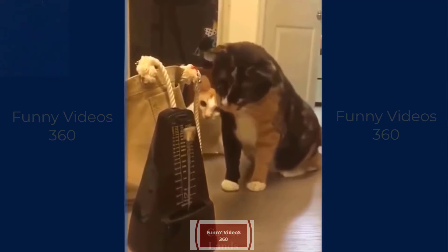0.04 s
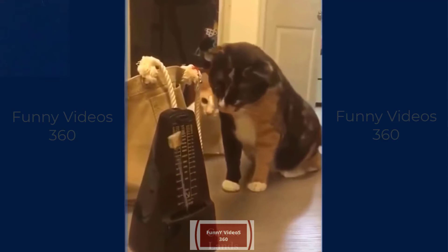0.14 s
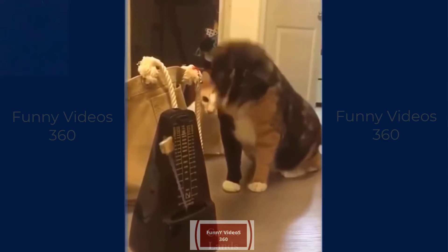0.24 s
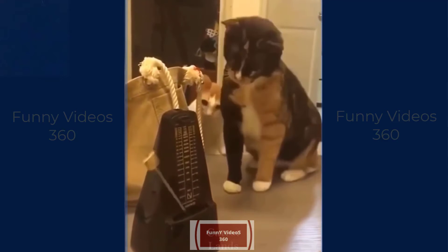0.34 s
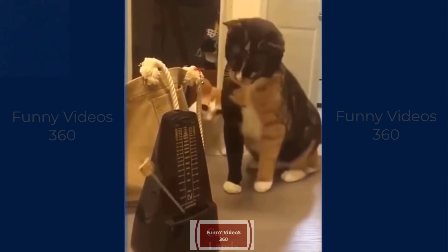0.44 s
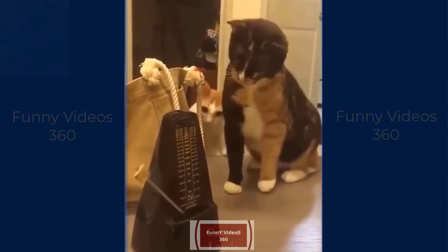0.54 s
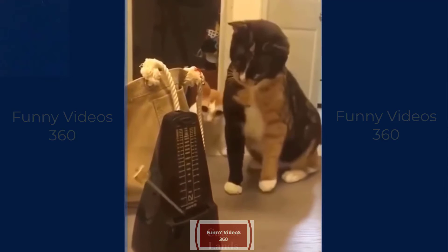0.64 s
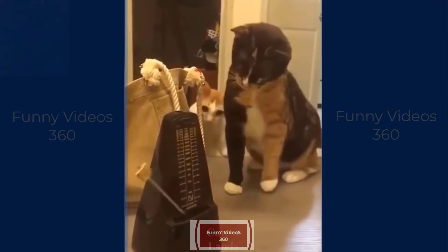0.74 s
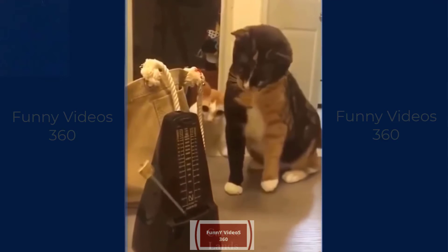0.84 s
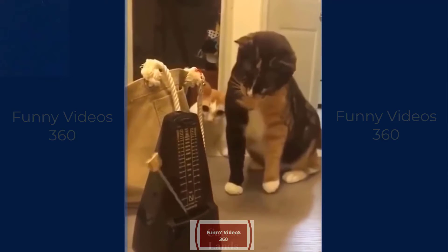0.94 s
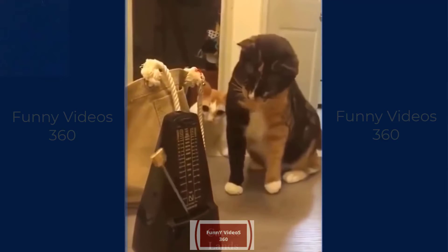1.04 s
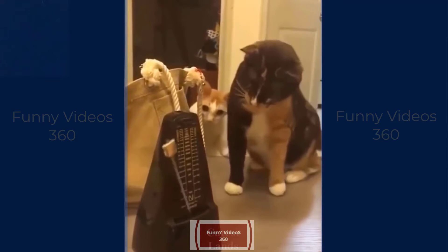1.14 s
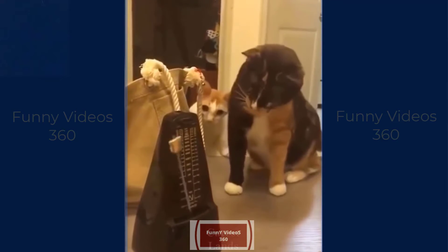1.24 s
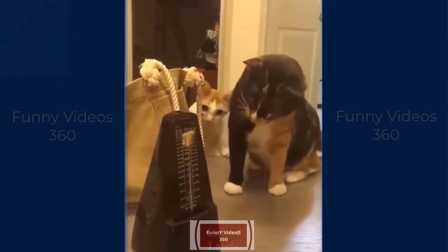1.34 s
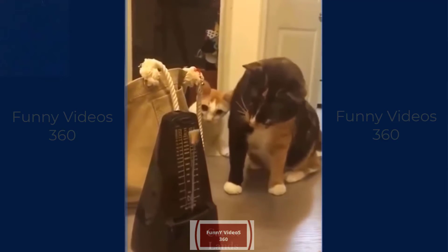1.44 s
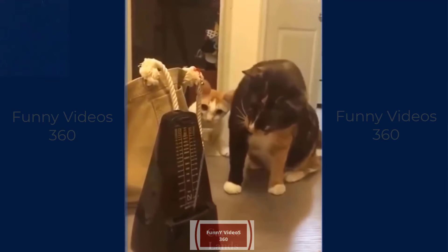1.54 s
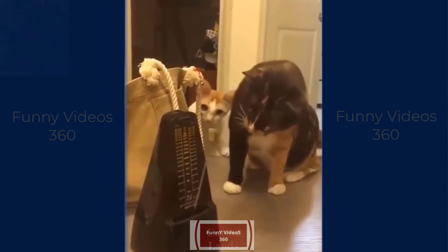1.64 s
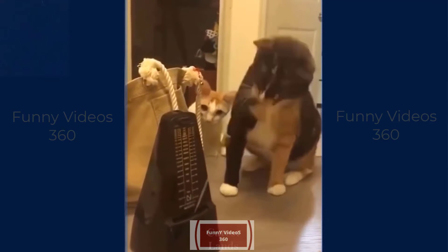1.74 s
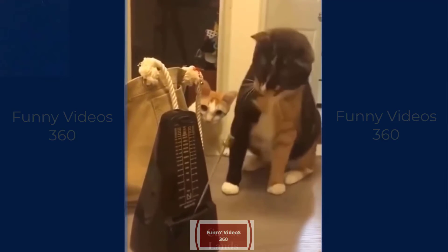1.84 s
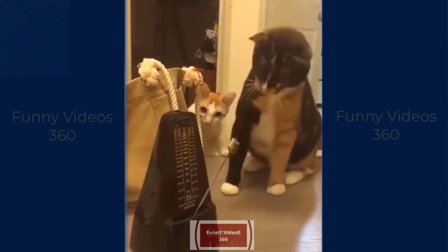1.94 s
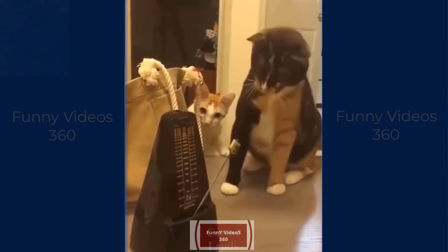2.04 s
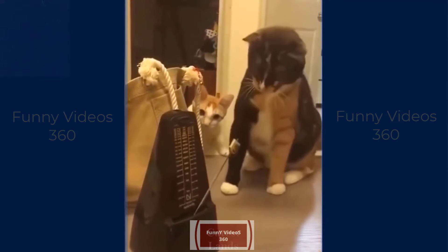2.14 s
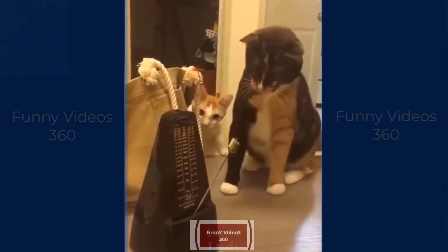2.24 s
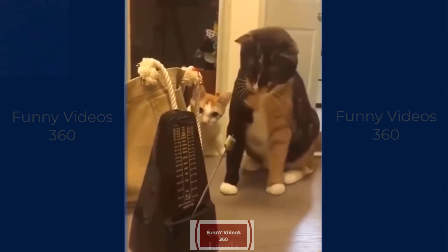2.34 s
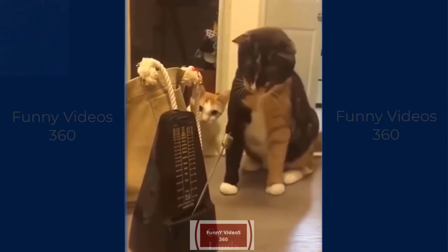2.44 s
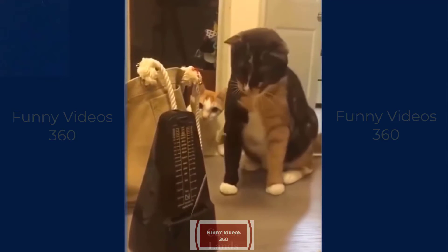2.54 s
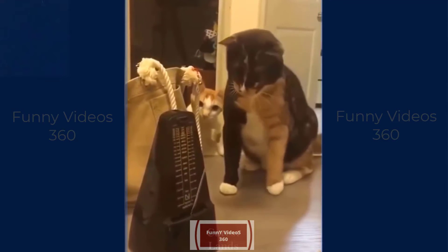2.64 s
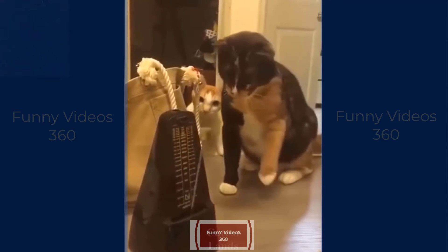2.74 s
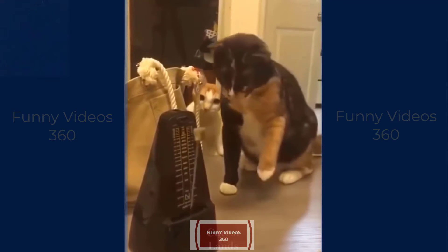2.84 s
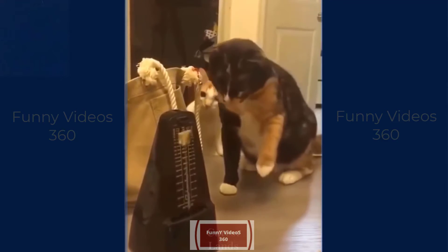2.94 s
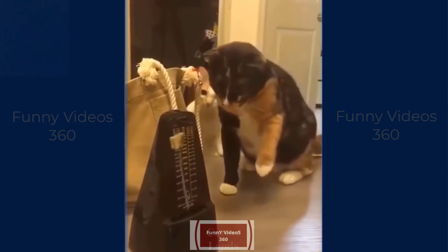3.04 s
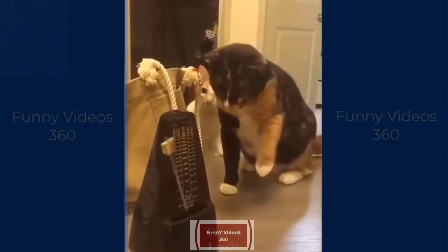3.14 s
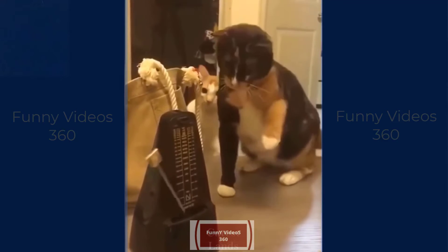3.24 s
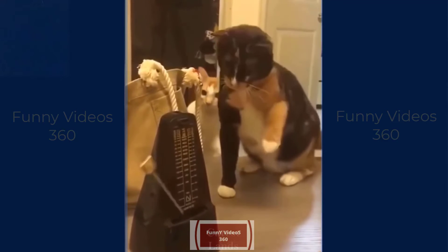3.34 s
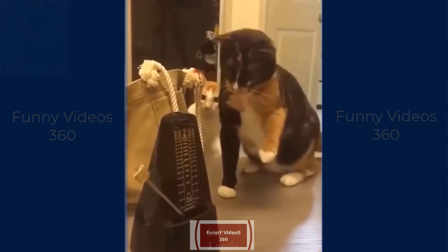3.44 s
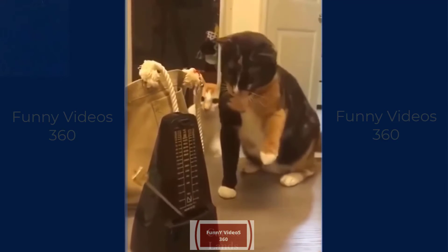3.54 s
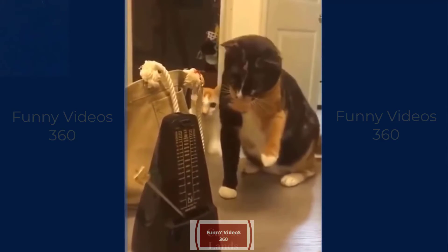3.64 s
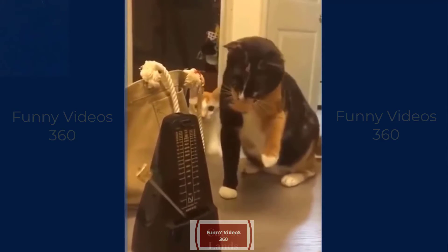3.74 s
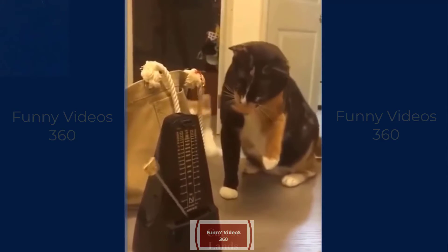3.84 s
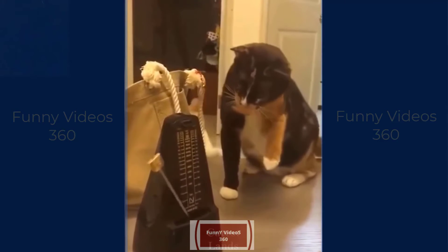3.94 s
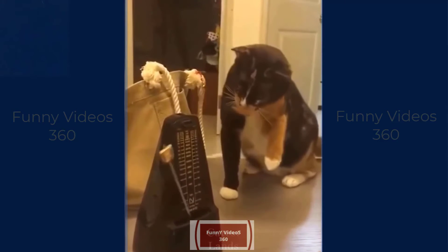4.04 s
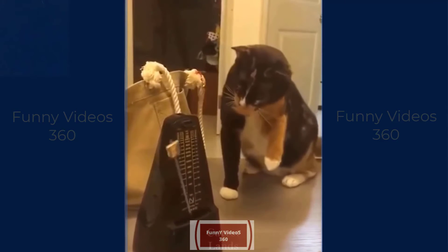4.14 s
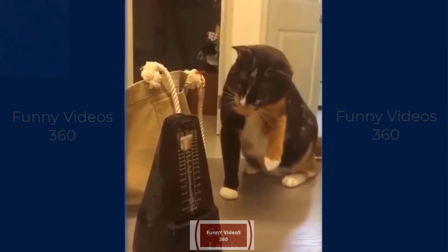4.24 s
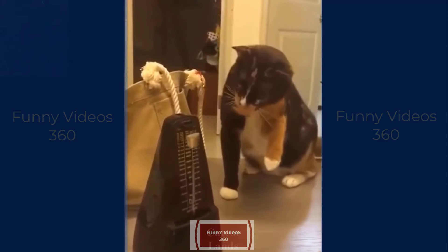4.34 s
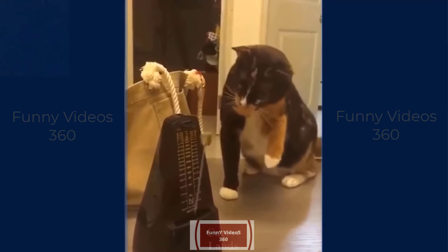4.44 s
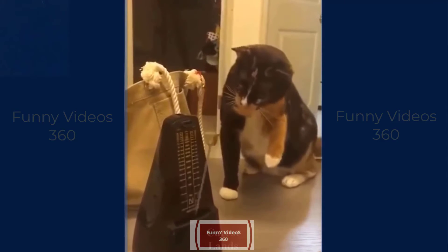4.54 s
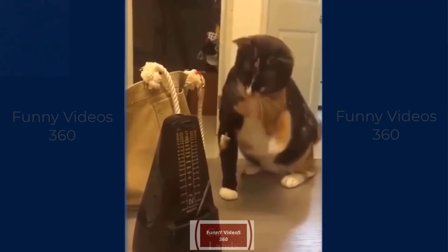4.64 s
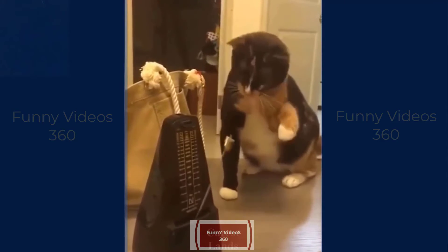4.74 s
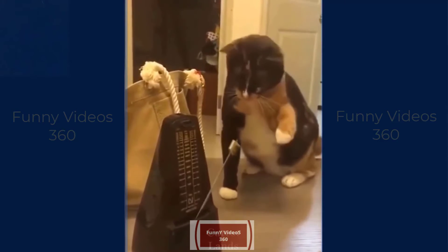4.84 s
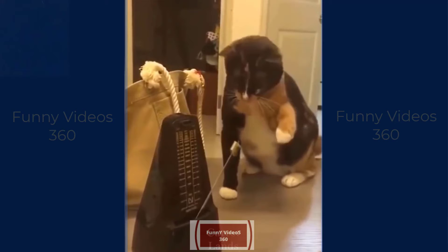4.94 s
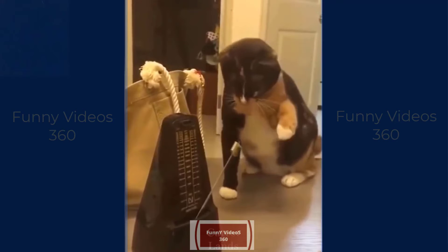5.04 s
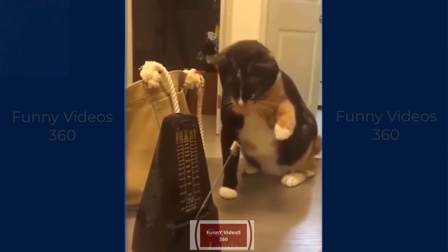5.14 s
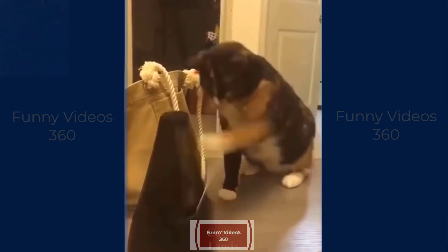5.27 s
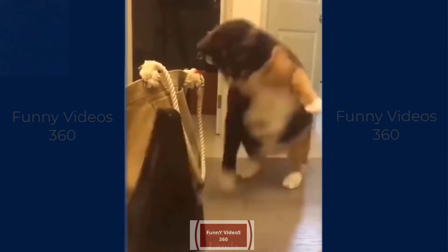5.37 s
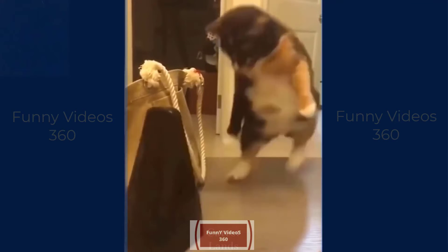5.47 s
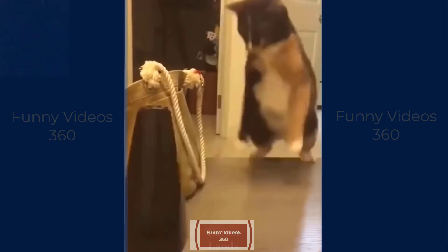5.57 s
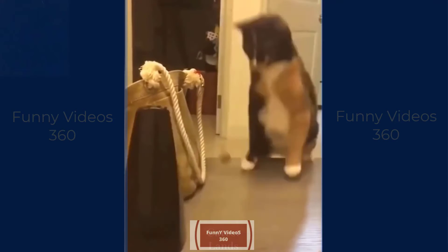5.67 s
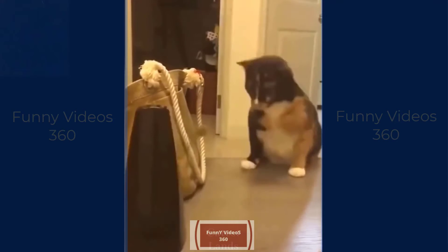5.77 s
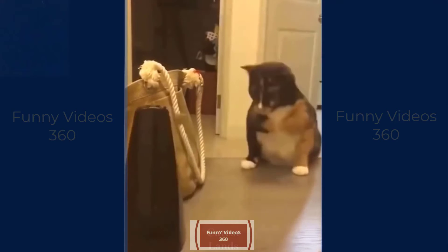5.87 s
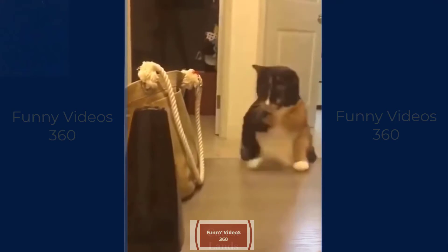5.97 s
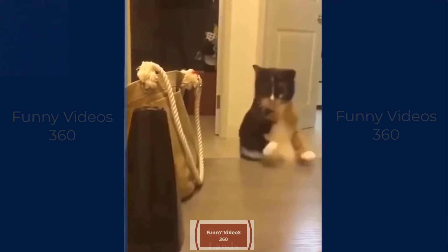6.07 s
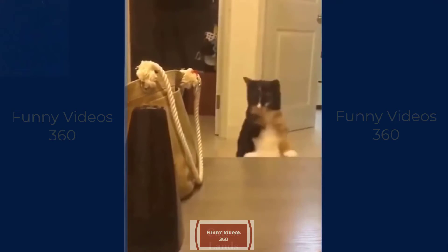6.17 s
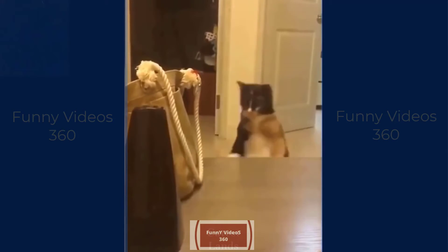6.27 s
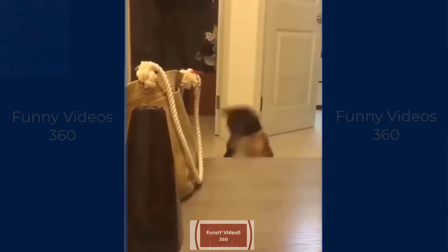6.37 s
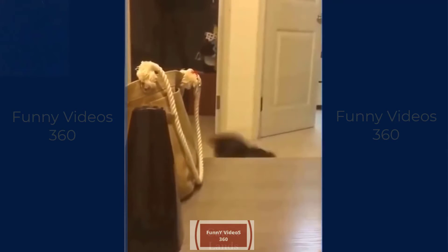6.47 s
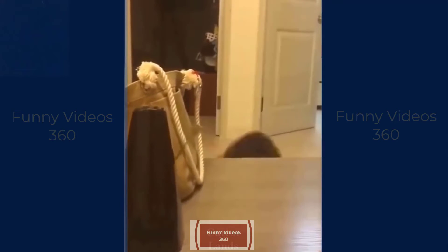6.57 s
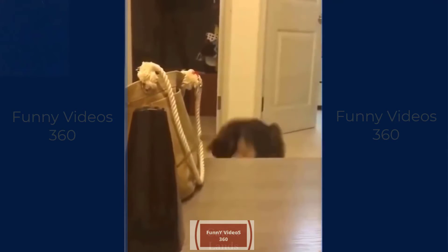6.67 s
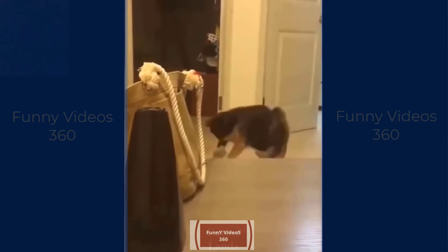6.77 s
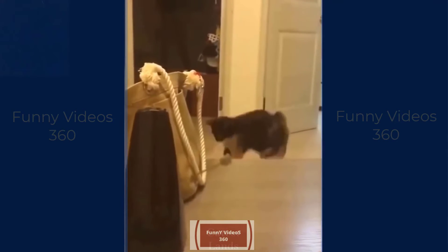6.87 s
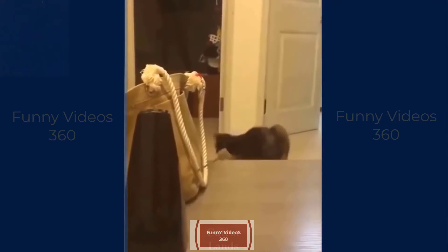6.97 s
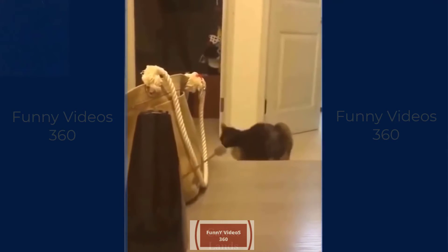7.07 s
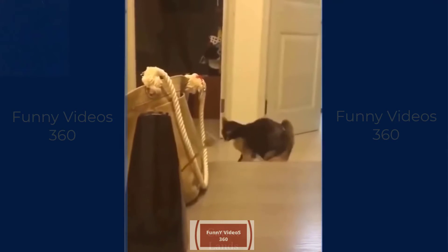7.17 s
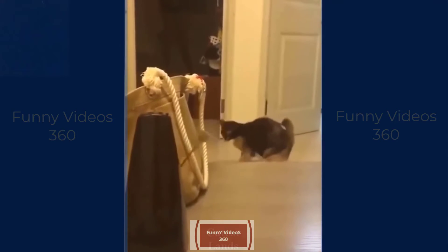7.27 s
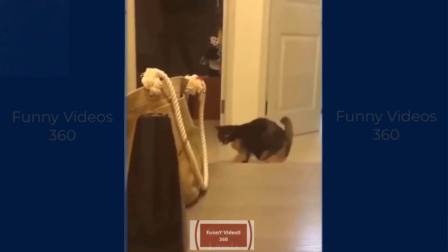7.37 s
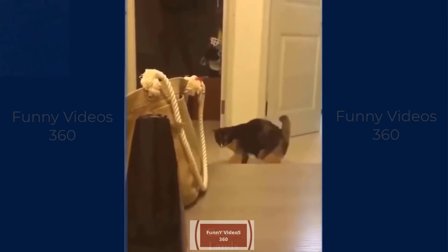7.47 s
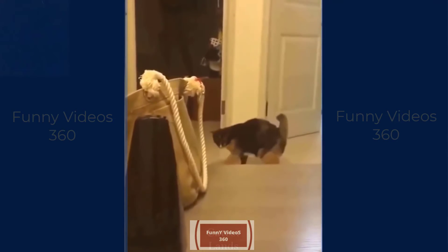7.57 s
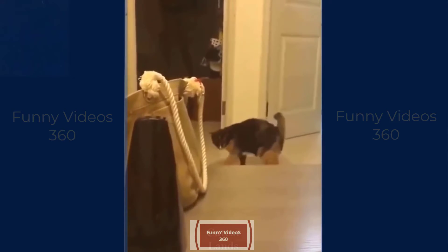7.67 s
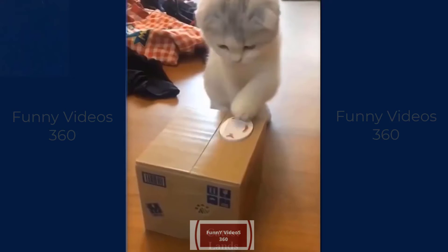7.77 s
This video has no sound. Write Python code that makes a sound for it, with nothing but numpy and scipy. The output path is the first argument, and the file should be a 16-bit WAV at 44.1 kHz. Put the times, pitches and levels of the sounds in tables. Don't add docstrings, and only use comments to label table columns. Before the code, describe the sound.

Slow hollow tick-tock close up in a humming room, interrupted by a sharp slap, clatter and table thumps, then two quicker-spaced beats.

```python
import sys
import numpy as np
from scipy import signal
from scipy.fft import rfft, irfft, next_fast_len
from scipy.io import wavfile
from scipy.ndimage import uniform_filter1d

SR = 44100
rng = np.random.default_rng(int(sys.argv[2]) if len(sys.argv) > 2 else 0)


def field_ratio(decibels):
    return 10 ** (np.asarray(decibels, dtype=float) / 20)


def to_wav(s):
    ch = np.atleast_2d(s).T
    pcm = np.round(np.clip(ch, -1, 1) * 32767)
    wavfile.write(sys.argv[1], SR, pcm.astype(np.int16))


N = 344416

# start_s, peak_db, hardness_db_per_octave
TURNED_BEATS = [
    (6.3309, -1.5, -1.1),
    (6.7980, -0.84, 1.8),
]
# start_s, peak_db, favoured_hz, crack_db
KNOCKS = [(0.7592, -47.5, 1900, 16.5), (1.4294, -50, 1710, 10), (5.5674, -9, 2320, 7),
          (5.5714, 1, 2144, -2.5), (5.5757, 3, 3420, -9), (5.6346, 0.5, 1860, -4),
          (5.687, -6.5, 1930, -0.5), (5.7214, -8, 2260, -4), (5.7538, -9.5, 2020, -7),
          (5.7877, -14, 2130, 2), (5.8641, -15.5, 2460, 11.5), (5.8794, -6.5, 1670, -4),
          (5.9623, -9, 2720, -7.5), (5.9968, -12, 2320, -0.5), (6.0054, -8.5, 2060, 1.5),
          (6.2038, -22.5, 1680, -40.5), (6.2347, -26, 1940, -30), (6.2831, -22.5, 1873, -11),
          (7.1866, -23, 1830, -7.5)]


def rms_one(x):
    return x / np.sqrt(np.mean(x ** 2) + 1e-20)


def at_hz(points, hz):
    point_hz, values = np.array(points).T
    return np.interp(np.log(hz), np.log(point_hz), values)


def coloured(x, spectrum):
    size = next_fast_len(len(x))
    hz = np.maximum(np.fft.rfftfreq(size, 1 / SR), 1)
    return irfft(rfft(x, size) * field_ratio(at_hz(spectrum, hz)), size)[:len(x)]


def clicks(seconds, gains):
    out = np.zeros(N)
    np.add.at(out, np.round(np.asarray(seconds) * SR).astype(int), gains)
    return out


def ring(x, hz, t60):
    radius = field_ratio(-60 / (t60 * SR))
    turn = 2 * np.pi * hz / SR
    return signal.lfilter([0, np.sin(turn)], [1, -2 * radius * np.cos(turn), radius ** 2], x + 1e-18)


def grains(per_s, spread_db):
    sizes = field_ratio(spread_db * np.minimum(rng.exponential(1, N), 4)) * rng.choice([-1, 1], N)
    return rms_one(sizes * (rng.random(N) < per_s / SR))


def strokes(rows, rise_db_per_s, fall_db_per_s):
    t = np.arange(N) / SR
    levels_db = []
    for start_s, db, hold_s in rows:
        rise_db = rise_db_per_s * np.maximum(start_s - t, 0)
        fall_db = fall_db_per_s * np.maximum(t - start_s - hold_s, 0)
        levels_db.append(db - rise_db - fall_db)
    return field_ratio(np.max(levels_db, axis=0))


def air_system():
    # pitch_hz, level_db_per_hz
    rush_colour = [(15, -49.5), (25, -26), (81, 0), (109, -12.5), (140, -8), (160, -21), (176, -6.5),
                   (192, 0), (217, -7.5), (340, -9.5), (383, -21), (525, -16), (900, -30), (1170, -60),
                   (1980, -120)]
    # pitch_hz, level_db_per_hz
    hiss_colour = [(470, -20.5), (800, -6.5), (965, -5), (1050, -1), (1310, -11.5), (1980, -7.5),
                   (2830, -13.5), (4120, -19), (4870, -25), (5700, -23.5), (8920, -30.5), (9700, -27.5),
                   (12600, -75), (21300, -120)]
    # pitch_hz, width_hz, rms_db
    ducts = [(74.6, 53, -38), (134.9, 8.7, -41), (191.3, 2.94, -35), (249.7, 30, -40.5)]
    size = next_fast_len(N)
    hz = np.fft.rfftfreq(size, 1 / SR)
    out = field_ratio(-29.5) * rms_one(coloured(rng.standard_normal(N), rush_colour))
    out += field_ratio(-49.5) * rms_one(coloured(rng.standard_normal(N), hiss_colour))
    for centre_hz, width_hz, db in ducts:
        peak = 1 / (1 + ((hz - centre_hz) / (width_hz / 2)) ** 2)
        hum = irfft(rfft(rng.standard_normal(size)) * peak, size)[:N]
        out += field_ratio(db) * rms_one(hum)
    return out * field_ratio(-1.5)


def beats(hz):
    # start_s, peak_db, hardness_db_per_octave
    ticks = [
        (0.5027, -1, 0.3),
        (0.5155, -23, 4),
        (3.4172, -1.5, 1.66),
        (3.4318, -13.5, 1.8),
    ]
    # start_s, peak_db, hardness_db_per_octave
    tocks = [
        (2.003, 0.33, 0.12),
        (4.898, 0.62, 0.21),
    ]
    pallet_delay_s = 0.0016
    trains = []
    for swings in (ticks, tocks, TURNED_BEATS):
        start_s, db, hardness_db = np.transpose(swings)
        trains.append(clicks(start_s + pallet_delay_s, field_ratio(db + hardness_db * np.log2(hz / 2000))))
    return trains


def snap(blows, t60):
    # pitch_hz, level_db_per_hz
    snap_colour = [(300, -10.5), (700, 2), (1400, -20), (2500, -1), (3500, -14), (5000, -12.5),
                   (8000, -14.5), (10000, -49), (14000, -41.5)]
    t = np.arange(round(min(t60, 0.02) * SR)) / SR
    burst = rms_one(coloured(rng.standard_normal(len(t)), snap_colour)) * field_ratio(-60 * t / t60)
    return signal.oaconvolve(blows, burst)[:N]


def contact_snaps():
    out = sum(field_ratio(db) * snap(x, t60=0.038) for db, x in zip((-22, -20, -17), beats(5000)))
    teeth = sum(beats(3000))
    for lead_s, db, t60 in ((0.0023, -26.5, 0.12), (0.0004, -25, 0.002)):
        out += field_ratio(db) * snap(np.roll(teeth, -round(lead_s * SR)), t60)
    for start_s, peak_db, _, crack_db in KNOCKS:
        out += snap(clicks([start_s], field_ratio(peak_db + crack_db - 9.5)), t60=0.027)
    return out


def pallet():
    # pitch_hz, t60_s, tick_db, tock_db, turned_db
    pallet_modes = [(2346, 0.0082, -2, -10, -16.5), (4440, 0.0069, -10, -10.5, -16.5),
                    (7870, 0.0075, -11, -9.5, -22)]
    out = np.zeros(N)
    for hz, t60, *levels_db in pallet_modes:
        out += ring(sum(field_ratio(db) * x for db, x in zip(levels_db, beats(hz))), hz, t60)
    return out


def case_modes():
    case_hz = [340, 665, 812, 925, 1080, 1280, 1765, 1978, 2170, 2472, 2605, 2810, 3298, 3440, 4070, 4545,
               4748, 5350, 7100, 7900, 8380]
    # t60_s, tick_db, tock_db, turned_db, rattle_db
    case_answers = [(0.21, -22.5, -27.5, -24, -7), (0.025, -0.5, -3.5, -6, -8),
                    (0.053, -12, -13, -2.5, -7.5), (0.048, -35, -18.5, -16.5, -22),
                    (0.024, -9, -12.5, -6, -8), (0.083, -23, -41.5, -31.5, -14),
                    (0.045, -9.5, -13.5, -11.5, -19), (0.071, -9.5, -15, -13.5, -10),
                    (0.035, -11, -12, -14.5, -8), (0.11, -13.5, -12.5, -26, -22),
                    (0.079, -8, -9.5, -18, -20), (0.031, -11, -12.5, -17, -26), (0.019, -3.5, -5.5, -6, -6),
                    (0.077, -17, -17, -25.5, -16.5), (0.054, -16.5, -16, -14, -15),
                    (.03, -15.5, -29, -39, -8.5), (0.045, -24.5, -18.5, -31.5, -20),
                    (0.023, -22.5, -21, -22.5, -17), (0.0059, -23.5, -25, -11, -27),
                    (0.014, -16.5, -18, -14.5, -17), (0.019, -28.5, -32.5, -33, -14)]
    # start_s, level_db, hold_s
    jolts = [
        (5.575, -11, 0.013),
        (5.6, -15.5, .13),
        (5.865, -20.5, .004),
        (6.005, -23, 0.0033),
        (6.16, -49, 0.14),
    ]
    panel_delay_s = 0.0018
    rattle = grains(1700, spread_db=4.5) * strokes(jolts, rise_db_per_s=1797, fall_db_per_s=250) * field_ratio(-25)
    knock_s, knock_db, knock_hz, _ = np.transpose(KNOCKS)
    spread = rng.standard_normal((len(KNOCKS), len(case_answers)))
    out = np.zeros(N)
    for k, (hz, (t60, *levels_db)) in enumerate(zip(case_hz, case_answers)):
        near_db = -9.0 * np.abs(np.log2(hz / knock_hz))
        knocks = clicks(knock_s, field_ratio(knock_db + near_db + 2 * spread[:, k]))
        sources = beats(hz) + [rattle + knocks]
        blows = sum(field_ratio(db) * x for db, x in zip(levels_db, sources))
        late = round(panel_delay_s * SR) * (hz < 1000)
        out += (-1) ** k * ring(field_ratio(-2.5) * np.roll(blows, late), hz, t60)
    return out


def metronome():
    return contact_snaps() + pallet() + case_modes()


def bare_blows():
    knock_s, knock_db, _, crack_db = np.transpose(KNOCKS)
    return sum(beats(5000)) + clicks(knock_s, field_ratio(knock_db + crack_db + 3.0))


def swat():
    # pitch_hz, level_db, t60_s
    rod_modes = [(3317, -4, 0.11), (3416, -3.5, 0.09), (4020, -7.5, .04), (4700, -3.5, 0.056),
                 (2100, -12.5, .04)]
    swat_s, swat_db = 5.5757, -6.5
    slap_gap_s, slap_loss_db, unevenness = 0.0095, 7.5, 0.146
    slap = np.arange(4)
    uneven = unevenness * rng.uniform(-0.76, 1, len(slap)) * (slap > 0)
    slap_s = swat_s + slap_gap_s * (slap + uneven)
    spread = rng.standard_normal((len(slap), len(rod_modes)))
    out = np.zeros(N)
    for k, (hz, mode_db, t60) in enumerate(rod_modes):
        slap_db = swat_db + mode_db - slap_loss_db * slap + 2 * spread[:, k]
        out += ring(clicks(slap_s, field_ratio(slap_db)), hz, t60)
    return out


def table_top():
    # start_s, peak_db, favoured_hz
    landings = [(5.585, -8.5, 356), (5.635, 5, 450), (5.659, 2.5, 211), (5.688, 7.5, 254), (5.704, 2, 290),
                (5.72, -1, 255), (5.74, -3, 250), (5.756, -3, 350), (5.778, 0.5, 346), (5.95, -14, 258),
                (5.981, -12.5, 221.7), (6.002, 2, 383), (6.026, -2, 500), (6.048, -11, 300)]
    # pitch_hz, level_db, t60_s
    board_modes = [(205, -5, 0.087), (245.6, -1, 0.047), (330, 1.5, 0.026), (367.3, -5.5, 0.089),
                   (427, -3, 0.04), (466.6, -2, 0.03), (555, -9, 0.037), (840, -13, 0.036),
                   (875, -21, 0.14)]
    judder_s, judder_loss_db, unevenness = 0.012, 8.5, 0.25
    touch = np.arange(4)
    uneven = unevenness * rng.uniform(-0.91, 1, (len(landings), len(touch))) * (touch > 0)
    start_s, peak_db, blow_hz = np.transpose(landings)[:, :, None]
    touch_s = (start_s + judder_s * (touch + uneven)).ravel()
    touch_db = (peak_db - judder_loss_db * touch).ravel()
    touch_hz = np.repeat(blow_hz.ravel(), len(touch))
    spread = rng.standard_normal((len(touch_s), len(board_modes)))
    out = np.zeros(N)
    for k, (hz, mode_db, t60) in enumerate(board_modes):
        near_db = -8.0 * np.abs(np.log2(hz / touch_hz))
        gains = field_ratio(touch_db + mode_db + near_db + 2 * spread[:, k])
        out += (-1) ** k * ring(clicks(touch_s, gains), hz, t60)
    out = signal.sosfilt(signal.butter(4, 165, "high", fs=SR, output="sos"), out)
    return field_ratio(-0.5) * signal.sosfilt(signal.butter(2, 700, fs=SR, output="sos"), out)


def paws():
    # start_s, rms_db, hold_s
    rustles = [
        (5.59, -28.5, 0.064),
        (5.68, -20, 0.04),
        (5.87, -24, 0.0038),
        (6.0, -19, 0.011),
        (6.22, -27, 0.031),
        (6.3, -32, 0.17),
        (6.55, -45.5, .5),
        (7.19, -40.5, 0.016),
    ]
    # pitch_hz, level_db_per_hz
    rustle_colour = [(180, -16), (300, 9), (406, -6), (837, -5), (1490, -24), (1910, -9), (3350, -23.5),
                     (7870, -37), (9500, -50.5), (12400, -91), (20900, -120)]
    fur = rms_one(coloured(grains(6000, spread_db=3.0), rustle_colour))
    return fur * strokes(rustles, rise_db_per_s=503.5, fall_db_per_s=167)


def side_panel():
    # pitch_hz, t60_s, left_swing_db, right_swing_db
    panel_modes = [(1860, .02, -17, -20.5), (2720, .025, -8.5, -19), (3160, .02, -18, -14),
                   (3290, .03, -17, -16.5), (3930, 0.03, -17, -20), (5620, .015, -17, -25),
                   (7000, .015, -33.5, -17), (8600, .02, -28.5, -22)]
    lead_s, seats_s, seats_db = 0.00022, 0.0026, 0.5
    touch_s = np.transpose(TURNED_BEATS)[0] + lead_s
    out = np.zeros(N)
    for hz, t60, *levels_db in panel_modes:
        touches = clicks(touch_s, field_ratio(levels_db) / 2)
        seats = clicks(touch_s + seats_s, field_ratio(levels_db) * field_ratio(seats_db))
        out += ring(touches + seats, hz, t60)
    return out


def room(x, blows):
    # delay_s, level_db
    reflections = [(.0021, -15), (.0058, -28.5), (0.0113, -15.5), (0.0162, -18), (.031, -16.5)]
    # pitch_hz, t60_s
    tail_t60 = [(200, 0.23), (700, 0.31), (1500, 0.39), (3000, 0.36), (6000, 0.36), (9000, 0.32)]
    # pitch_hz, level_db
    tail_colour = [(200, -37), (700, -31), (1500, -29), (3000, -30), (6000, -28.5), (9000, -28.5)]
    # pitch_hz, level_db_per_hz
    all_round_colour = [(250, -25), (600, 3), (950, 1), (1400, -9), (1900, -2.5), (2600, -4), (3400, -6),
                        (3800, -7), (4700, -15.5), (6000, -13), (8000, -23), (9800, -26.5), (14000, -40.5)]
    t = np.arange(SR // 2) / SR
    tail = np.zeros((2, len(t)))
    white = rng.standard_normal((2, 2, len(t)))
    edges = 140 * 2 ** np.arange(0, 6.6, 0.5)
    for k, (low, high) in enumerate(zip(edges, edges[1:])):
        hz = np.sqrt(low * high)
        band = signal.sosfilt(signal.butter(2, [low, high], "band", fs=SR, output="sos"), white[k % 2])
        tail += band * field_ratio(at_hz(tail_colour, hz) - 60 * t / at_hz(tail_t60, hz))
    tail *= 1 - np.exp(-(t / 0.0035) ** 2)
    early = np.zeros(len(t))
    early[0] = 1
    for delay_s, db in reflections:
        early[round(delay_s * SR)] = field_ratio(db)
    all_round = [field_ratio(-8) * x, field_ratio(20.0) * coloured(blows, all_round_colour)]
    reverberation = signal.oaconvolve(all_round, tail, axes=1).sum(0)[:N]
    return signal.oaconvolve(x, early)[:N] + reverberation


def scene():
    in_room = room(metronome() + table_top() + paws(), bare_blows())
    return (in_room + air_system() + swat() + side_panel())[None]


def top_cut(x):
    return signal.sosfilt(signal.butter(12, 9850, fs=SR, output="sos"), x)


def low_pass(x, hz):
    return signal.sosfiltfilt(signal.cheby2(10, 30, hz, fs=SR, output="sos"), x)


def record(dry):
    # from_s, to_s
    narrowed = [
        (5.72, 5.95),
        (6.03, 6.15),
        (6.8, 6.99),
    ]
    wide, narrow = low_pass(dry, 10140), low_pass(dry, 9340)
    t = np.arange(N) / SR
    inside = sum((t > from_s) * (t < to_s) * 1.0 for from_s, to_s in narrowed)
    dulled = uniform_filter1d(inside, size=400)
    return top_cut(np.clip(wide + dulled * (narrow - wide), -1, 1))


dry = scene()
out = record(dry)
to_wav(out)
```